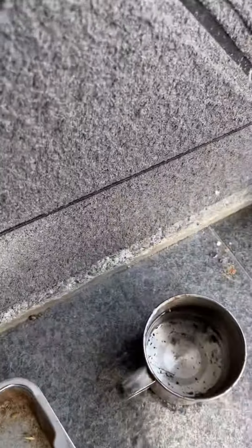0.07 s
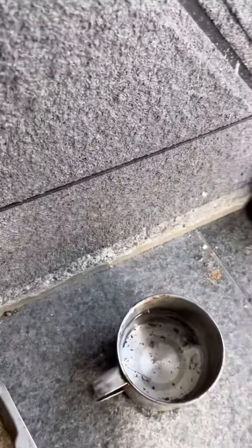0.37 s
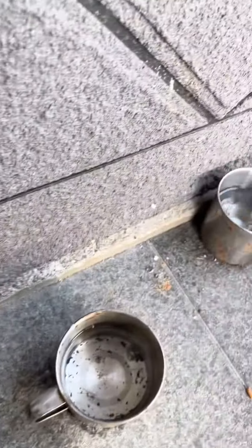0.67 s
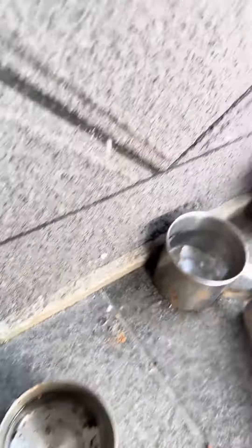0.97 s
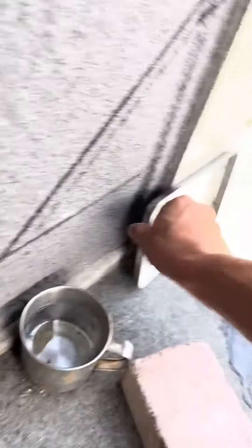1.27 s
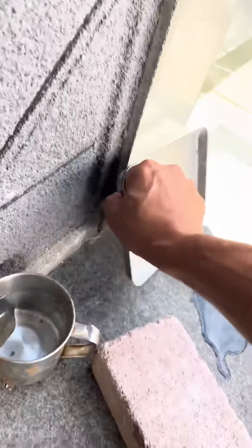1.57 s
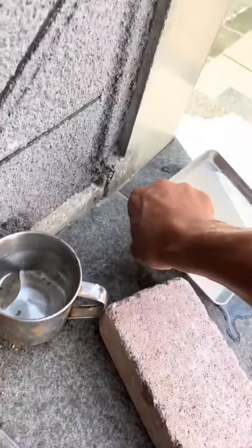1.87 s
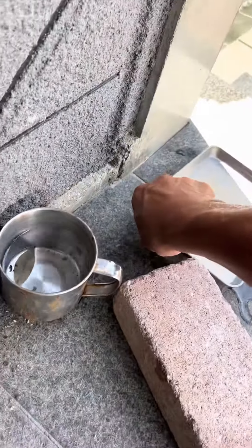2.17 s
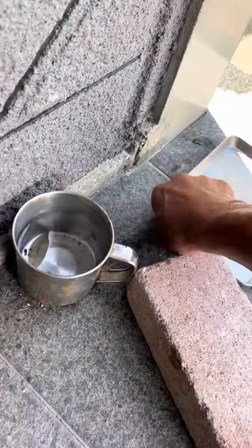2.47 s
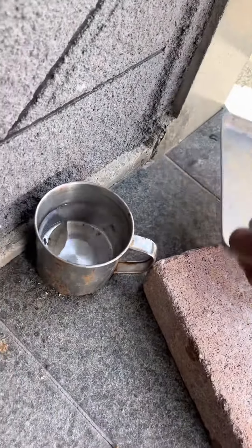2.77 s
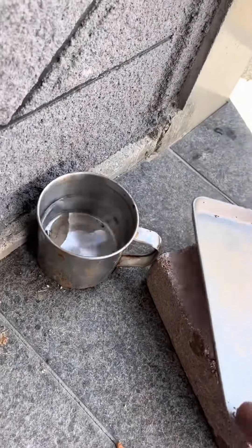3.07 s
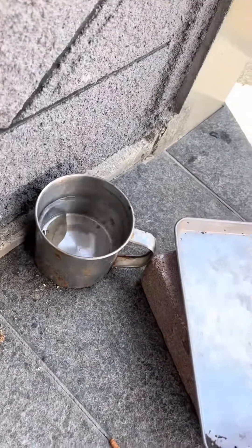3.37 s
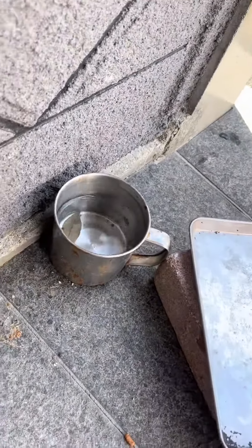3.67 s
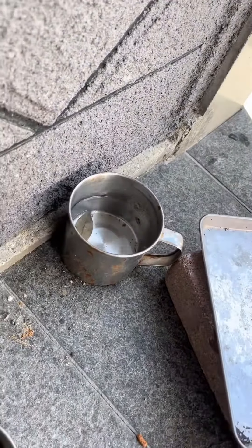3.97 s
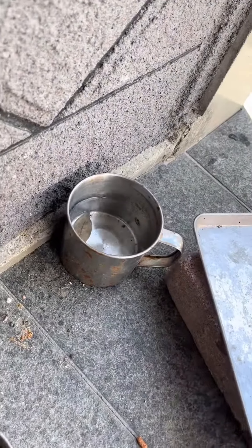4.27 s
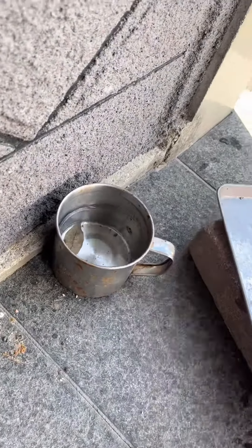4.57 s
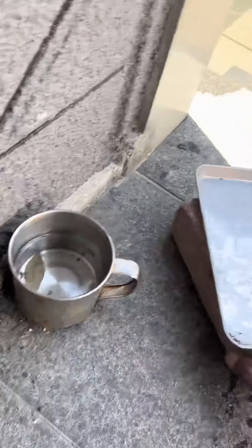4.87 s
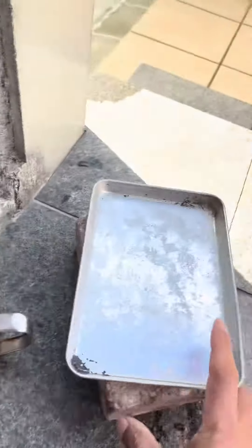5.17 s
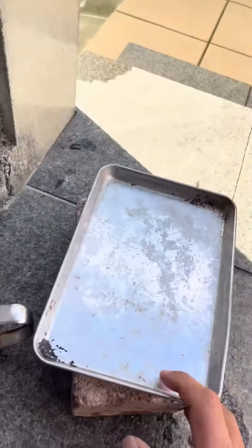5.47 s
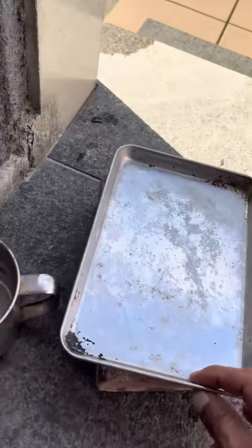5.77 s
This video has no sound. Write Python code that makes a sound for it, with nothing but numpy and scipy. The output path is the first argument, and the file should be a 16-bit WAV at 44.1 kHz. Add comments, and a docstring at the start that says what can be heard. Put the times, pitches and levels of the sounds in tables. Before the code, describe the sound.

Close metal clanks and a bright clatter come from a steel dish and cup on stone paving, followed by dull brick knocks. A thin tray rattles, clangs once, then clatters down onto the brick. After that the brick grinds and jolts across sandy stone, with a tiny squeal and some scuffs. Nearby walls add a short echo, and soft wind and handling bumps touch the microphone over an outdoor hush.

```python
"""A light knock, then a steel dish clanks and a cup clatters on the stone paving of an open porch.
A brick knocks down; a thin tray is picked up, bumped and dropped rattling onto it; then the brick is
dragged over gritty stone, ending in a thin squeal. Impacts excite normal modes, long-lived in steel and
heavily damped in brick; stick-slip friction makes the grinding. Close walls reverberate, and air and
handling rumble on the microphone over a quiet outdoor hush."""
import sys
import numpy as np
from scipy import signal
from scipy.fft import rfft, irfft, next_fast_len
from scipy.io import wavfile
from scipy.ndimage import map_coordinates

SR = 44100
rng = np.random.default_rng(int(sys.argv[2]) if len(sys.argv) > 2 else 0)


def to_wav(s):
    """Save 16-bit WAV."""
    ch = np.atleast_2d(s).T  # columns
    pcm = np.round(np.clip(ch, -1, 1) * 32767)  # PCM
    wavfile.write(sys.argv[1], SR, pcm.astype(np.int16))


N = 264732
TIME = np.arange(N) / SR
AGE = TIME[:SR]  # time since a blow

# contacts of the tray: t/s, level/dB, bass/dB, treble/dB, favoured f/Hz, ring/dB, damping t60/s
TRAY_CONTACTS = [(1.393, -17, -18, -14, 3020, -4, 0.56), (1.412, -19, -3, -36, 3060, 4.5, 0.18),
                 (1.430, -26, 7.5, -8, 700, 7, 2.2), (1.454, -18.5, -6, -2.5, 3070, 3, 0.39),
                 (1.489, -15.5, -4.5, -7, 1130, 7.5, 0.23), (1.514, -24.5, 8.5, -6, 670, 5, 5),
                 (1.8334, -2, -7.5, -21.5, 1900, -5.5, 2.2), (2.032, -17.5, -0.5, -14, 2250, -7.5, 1.7),
                 (2.097, -26, 3.5, -21, 990, 4, 0.3), (2.116, -20, 1, -18, 1160, -1, 0.47),
                 (2.134, -19, -16, -13.5, 2330, 0.5, 1.7), (2.555, -27.5, -6, -27, 5500, 8, 0.94),
                 (2.9447, -5.5, -4, -7.5, 2220, -18, 0.37), (3.058, -9.5, -9.5, -8, 1920, -2.5, 0.78),
                 (3.0922, -7, -4, -4, 4300, -10, 0.7), (3.1433, -9.5, -4.5, -6.5, 4530, 0.5, 0.12),
                 (3.164, -11, -3, -23, 1020, -16, 0.18), (3.1874, -9.5, -9, -10, 584, -18, 0.2),
                 (3.2048, -16, -14, -13, 2250, -5, 0.1), (3.231, -16, -2.5, -4.5, 6070, 4, 0.093)]
# normal modes of the tray: f/Hz, level/dB, t60/s
TRAY_MODES = [(386, -8.5, 0.19), (581, -8, 0.23), (701, -9.5, 1), (765, -8, 0.55), (1008.4, 2.5, 0.27),
              (1307, -15.5, 3.9), (1619, -3.5, 0.29), (1908, 0.5, 0.5), (2130, -5.5, 0.25),
              (2400, -9, 0.33), (2445, 3, 0.24), (2730, -8, .26), (3110, -1.5, 0.11), (3220, -7, 0.14),
              (3400, -11, 0.35), (3600, -11, 1.02), (3756, -16, 0.98), (3830, -10, 0.45), (4180, -6, 0.1),
              (4400, -28, 0.25), (4180, -5.5, 0.21), (4870, -34, 0.33), (5200, -27, 0.096), (5360, -24, .4),
              (5500, -8.5, 0.31), (5620, -1.5, 0.18), (6700, -5, 0.083), (7900, -18, .16),
              (10430, -31, 0.107)]


def steel(contacts, modes, mode_db, shimmer_db, shimmer_t60, chatter_db, chatter_t60,
          crack_db, mid_db, top_db, wet_db, count=130):
    """Modal superposition: each impact cracks, chatters and rings main modes and a crowd of weak ones."""
    crowd_hz = np.linspace(900, 15500, count) * np.exp(rng.normal(0, 0.0198, count))
    crowd_t60 = shimmer_t60 * (crowd_hz / 3000) ** -.35 * np.exp(rng.normal(0, 0.085, count))
    crowd = damped_sine(crowd_hz[:, None], crowd_t60[:, None])
    hz, level, t60 = np.transpose(modes)
    main = damped_sine(hz[:, None], t60[:, None])
    track = np.zeros(N)
    for s, db, bass_db, treble_db, favoured_hz, ring_db, damping_t60 in contacts:
        # the point of contact favours one group of modes
        favour = [(favoured_hz / 1.35, 0), (favoured_hz, 6), (favoured_hz * 1.35, 0)]
        tilt = [(700, 0.41 * bass_db), (1900, 0), (5000, 0), (11000, treble_db / 2)]
        scatter = amp(rng.normal(0, 1.5, len(hz))) * rng.choice([-1, 1], len(hz))
        strengths = amp(level + along(favour, hz) + along(tilt, hz)) * scatter
        # hand or ground damps the high modes sooner
        damped = main * fade(damping_t60 * (hz[:, None] / 2000) ** -.5)
        ring = amp(mode_db + ring_db) * (strengths @ damped)
        crowd_ring = rng.standard_normal(count) @ crowd / np.sqrt(count)
        shimmer = amp(shimmer_db) * crowd_ring * fade(damping_t60)
        # the rim buzzes against the stone, and every tiny touch sets the sheet ringing again
        touches = grains(SR, 1.6) * fade(chatter_t60)
        buzz = convolve(touches, shimmer * fade(0.022))
        chatter = amp(chatter_db) * (buzz + touches / 2)
        crack = amp(crack_db) * rng.standard_normal(SR) * fade(0.033)
        # a hard contact is bright, a padded one falls off steeply
        tone = [(100, bass_db - 20.5), (300, bass_db), (600, bass_db + 6), (1000, bass_db + 6.5),
                (2400, mid_db), (5000, -3.5), (8500, treble_db), (15000, 2.47 * treble_db + top_db)]
        clash = colour(colour(shimmer + chatter + crack, tone), favour)
        add(track, s, amp(db) * (porch(clash, wet_db) + ring))
    return track


def dish():
    """Free vibration of a struck steel shell: its low modes ring on after the clank."""
    # t/s, level/dB, bass/dB, treble/dB, favoured f/Hz, ring/dB, damping t60/s
    contacts = [(0.2915, -9.5, -1, -17.5, 955, -3, 4), (0.3014, -11.5, -5.5, -13.5, 1000, -4.5, 3.9),
                (0.3411, -8, -13, -23.5, 2410, -2.5, 1.1), (0.3504, -23.5, 6.5, -20, 570, 5, 6.6),
                (0.4424, -25.5, -5.5, -14.5, 774, -7.5, 3)]
    modes = [(531.4, -7.5, 0.83), (674.7, 1, 0.84), (758, -4, 0.46), (775, -10.5, 1.6), (948, 4, 0.12),
             (1027, 12, 0.093), (1126, -8, .6), (1343, -2, 0.47), (1670, 0, 0.19), (2020, -4, 0.26),
             (2133, -6, .2), (2305, -5.5, 0.61), (2420, 0, 0.095), (2703, -11.5, 0.23), (3476, -4, 0.34),
             (3924, 1.5, 0.15), (4300, -14.5, 0.87), (6830, -15, 0.32)]  # f/Hz, level/dB, t60/s
    return steel(contacts, modes, mode_db=-14.5, shimmer_db=-24, shimmer_t60=0.58, chatter_db=-9.5,
                 chatter_t60=0.19, crack_db=-18.5, mid_db=2.5, top_db=14, wet_db=-2)


def cup():
    """A smaller shell has higher natural frequencies, so its impacts clatter brightly."""
    # t/s, level/dB, bass/dB, treble/dB, favoured f/Hz, ring/dB, damping t60/s
    contacts = [(0.606, -6, -5.5, -7, 4200, -3, 0.75), (0.614, -7, -22, -2.5, 6430, 5, 0.8),
                (0.6244, -17, 1, -7, 4400, 9.5, 1.3), (0.642, -10, -21, -8, 6400, 8, 0.43),
                (0.666, -6, -16, -11, 4070, -3, 1.5), (0.6754, -15, 0.5, -2, 4230, -7, 3.6),
                (0.7044, -10, -6, -4, 5600, 3.5, 7.8)]
    modes = [(550, -9.5, 0.13), (1292, -8.5, 0.66), (2800, -15, 0.077), (3660, -11, 0.46), (3870, -19, .3),
             (4030, -17.5, 0.79), (4160, -3, 0.081), (4286, -2.5, 0.11), (5480, -11.5, 0.3),
             (5530, -7, 0.23), (6170, -20, .28), (8300, -9, 0.27), (8860, -10.5, 0.12), (10314, -15, 0.2),
             (11720, -13.5, 0.12), (13700, -20, .14)]  # f/Hz, level/dB, t60/s
    return steel(contacts, modes, mode_db=-18, shimmer_db=-2, shimmer_t60=0.074, chatter_db=-13,
                 chatter_t60=0.04, crack_db=-7, mid_db=-11.5, top_db=6, wet_db=-1.5)


def tray():
    """Impacts excite the bending modes of a thin plate as it is lifted, bumped and dropped."""
    return steel(TRAY_CONTACTS, TRAY_MODES, mode_db=-17.5, shimmer_db=-8.5, shimmer_t60=0.32,
                 chatter_db=-6, chatter_t60=0.088, crack_db=-1.5, mid_db=-4.5, top_db=-1, wet_db=-9)


def tray_slide(sing_hz=2405, focus_db=17):
    """Forced vibration: friction at the sliding edge drives the tray's modes, most near sing_hz."""
    focus = [(sing_hz / 1.1, 0), (sing_hz, focus_db), (sing_hz * 1.05, 0)]
    modes = [(hz, db + along(focus, hz), min(t60, .17))
             for hz, db, t60 in TRAY_MODES if hz > sing_hz / 2]
    friction = swell(s=2.532, db=-32.5, rise=0.035, fall=0.07) * grains(N, 2.4)
    return resonate(friction, modes)


def brick_knocks(crunch_db=-10, over_brick_s=2.8, thud_db=-5.5, thud_hz=375, thud_contact_s=0.0015):
    """Heavy damping leaves the struck brick a dead clack; a longer contact softens the attack."""
    blows = [(0.2097, -16, 690, 0.00058), (0.698, 0.5, 1132, 0.00048), (0.738, -13, 1270, 0.001),
             (0.9308, 2.5, 1100, 0.00073), (0.945, -7, 1330, 0.0019), (2.207, -21, 975, 0.0018)]  # t/s, level/dB, f/Hz, contact time/s
    modes = [(0.599, -6.5, 0.015), (.92, -1.5, 0.014), (1.25, -7.5, 0.015), (2.1, -7, 0.0072)]  # frequency ratio, level/dB, t60/s
    # the falling tray also thuds on the brick
    thuds = [(s, db + thud_db, thud_hz * np.exp(rng.normal(0, .1)), thud_contact_s)
             for s, db, *_ in TRAY_CONTACTS if s > over_brick_s]
    track = np.zeros(N)
    for s, db, hz, contact_s in blows + thuds:
        clack = sum(amp(level) * damped_sine(ratio * hz, t60) for ratio, level, t60 in modes)
        stone = [(hz / 7, -16), (hz / 3, -1), (hz * 1.3, 0),
                 (hz * 2.5, -10), (hz * 4.5, -28), (hz * 10, -55)]
        crunch = amp(crunch_db) * unit(colour(rng.standard_normal(SR), stone)) * fade(0.028)
        attack = 1 - np.exp(-(AGE / contact_s) ** 2)
        add(track, s, amp(db) * porch((clack + crunch) * attack, wet_db=-10))
    return track


def brick_drag(start_s=4.09, attack_s=0.19, stop_s=5.31, release_s=0.11, pull_db=-40.5,
               grit_db=-40, grit_growth=0.75, wear_db_per_s=6.5):
    """Stick-slip friction: the brick grinds and jolts while crushed grit hisses and screeches."""
    shoves = [(4.27, -34, 0.061, 0.034), (4.39, -28, 0.12, 0.41), (4.555, -28, 0.18, 0.2),
              (4.647, -20, 0.015, 0.1), (4.872, -26.5, 0.1, 0.19), (5.225, -22.5, 0.19, 0.19),
              (5.295, -27, 0.074, 0.092)]  # on top of the steady pull: t/s, level/dB, rise/s, fall/s
    jolts = [(4.368, -12), (4.445, -9.5), (4.567, -15), (4.638, -10), (4.872, -8), (4.942, -12),
             (5.193, -15), (5.236, -18)]  # the brick catches: t/s, level/dB
    grind_spectrum = [(150, -25), (280, -2), (350, 0.5), (720, 4), (1050, 0), (1600, -14), (2600, -17),
                      (5000, -43)]  # f/Hz, level/dB
    grit_spectrum = [(600, -10), (2000, -1.5), (3500, -4), (4300, -2), (5200, -17), (6200, -8), (8900, -15),
                     (10400, -24), (12500, -23), (15500, -23)]  # f/Hz, level/dB
    sand_spectrum = [(800, 6.5), (2800, 8), (6000, 3), (9000, -1), (15500, -4)]  # f/Hz, level/dB
    screech_modes = [(4540, -1.5, 0.039), (4820, -8, 0.022), (4860, -1, 0.039), (5400, -6.5, 0.04),
                     (5920, -7.5, 0.018), (9730, -7, 0.035), (9700, -13.5, 0.012), (14100, -20, .02)]  # f/Hz, level/dB, t60/s
    moving = np.clip((TIME - start_s) / attack_s, 0, 1)
    stopping = amp(-20 * np.maximum(TIME - stop_s, 0) / release_s)
    effort = power_sum([amp(pull_db) * moving] + [swell(*shove) for shove in shoves]) * stopping
    slips = wobble(90)
    push = power_sum([amp(-2) * effort * unit(amp(1.05 * slips)), amp(-10) * bursts(jolts, t60=0.048)])
    grinding = push * friction_noise(grind_spectrum, 3.6)
    # the grit follows the push and, from the second shove on, thins out as it is ground down
    worn = amp(-wear_db_per_s * np.maximum(TIME - shoves[1][0], 0))
    grit_gain = amp(grit_db) * worn * (push / amp(-31)) ** grit_growth * np.sqrt(moving)
    # each resonance flares by itself, and only under a firm push
    flares = sum(amp(db + 4 * wobble(25)) * resonate(grains(N, 9.2), [(hz, db, t60)])
                 for hz, db, t60 in screech_modes)
    screech = amp(-2) * np.tanh(effort / amp(-38.5)) * unit(flares)
    hiss = unit(colour(grains(N, 3.3), grit_spectrum) * amp(4 * slips))
    # loose sand is swept aside as the brick first moves
    sweep = swell(s=4.145, db=-38, rise=0.05, fall=0.4) * stopping
    sand = sweep * friction_noise(sand_spectrum, 4.7)
    return porch(grinding + grit_gain * (hiss + screech) + sand, wet_db=-17.5)


def scuffs(stroke_db=-2, tick_db=-8, stutter_s=4.1948, stutter_gap_s=0.026, stutter_db=-25):
    """Sliding friction on rough stone: light strokes rasp, and single sand grains fracture."""
    strokes = [(0.286, -43.5, -50, 0.02, 0.026), (0.875, -39.5, -40, 0.04, 0.05),
               (0.917, -41.5, -33.5, 0.024, 0.048), (2.165, -36, -41.5, 0.047, 0.035),
               (2.314, -39.5, -52, 0.037, 0.053), (2.49, -35.5, -44.5, 0.042, 0.075),
               (2.535, -33, -52, 0.04, 0.04), (2.566, -51, -34.5, 0.035, 0.025),
               (3.906, -36, -34.5, 0.013, 0.075), (5.569, -39, -38.5, 0.058, 0.038),
               (5.698, -30.5, -46, 0.025, 0.078), (5.745, -29.5, -35, 0.022, 0.068),
               (5.775, -49, -30.5, 0.1, 0.1), (5.826, -29, -24.5, 0.016, 0.043),
               (5.882, -38, -43, 0.04, 0.03)]  # t/s, rasp level/dB, sand level/dB, rise/s, fall/s
    ticks = [(0.8498, -31), (0.9023, -27), (3.7733, -38), (3.8198, -28), (3.9239, -24.5), (3.9708, -31),
             (4.115, -28), (5.218, -21.5), (5.5528, -25), (5.5639, -21), (5.6645, -23.5), (5.821, -18),
             (5.8314, -19.5)]  # grains cracking under an edge: t/s, level/dB
    rasp_spectrum = [(300, -16), (900, 10), (2500, 4.5), (4000, -1.5), (7000, -18)]  # f/Hz, level/dB
    sand_spectrum = [(2000, -34), (4200, 4), (6300, 4.5), (9000, -2), (12000, -6), (15500, -5)]  # f/Hz, level/dB
    crack_spectrum = [(300, -7), (1200, 1.5), (3000, 4.5), (6500, -1), (10000, -2.5), (15500, -19)]
    rasp_gain = power_sum(swell(s, db, rise, fall) for s, db, _, rise, fall in strokes)
    sand_gain = power_sum(swell(s, db, rise, fall) for s, _, db, rise, fall in strokes)
    rasp = rasp_gain * friction_noise(rasp_spectrum, 4.5)
    sand = sand_gain * friction_noise(sand_spectrum, 2.5)
    # the brick sticks and slips evenly as it gets going
    stutter = [(stutter_s + k * stutter_gap_s, stutter_db) for k in range(5)]
    cracks = bursts(ticks + stutter, t60=0.056) * friction_noise(crack_spectrum, 0.9)
    return porch(amp(stroke_db) * (rasp + sand) + amp(tick_db) * cracks, wet_db=-11.5)


def squeal(pitch_hz=2196, rise_hz_per_s=170):
    """A harmonic series on a slowly rising fundamental pulses thinly as the drag ends."""
    pulses = [(5.355, -38, 0.09, 0.029), (5.425, -48, 0.016, 0.04), (5.472, -50.5, 0.015, 0.052)]  # t/s, level/dB, rise/s, fall/s
    hz = pitch_hz + rise_hz_per_s * (TIME - pulses[0][0])
    phase = 2 * np.pi * np.cumsum(hz) / SR
    tone = sum(amp(db) * np.sin(k * phase) for k, db in enumerate([1, -10, -22, -19], 1))
    return porch(sum(swell(*pulse) for pulse in pulses) * tone, wet_db=-2.5)


def porch(x, wet_db, delay_s=0.0057):
    """Reverberation: close walls add a diffuse tail to x, in which the treble dies first."""
    decay_times = [(200, 0.7), (1000, 0.32), (4000, 0.26), (14000, 0.12)]  # f/Hz, t60/s
    hz, t, spectra = signal.stft(rng.standard_normal(SR // 2), SR, nperseg=256)
    decay = np.exp(-np.log(1000) * t / along(decay_times, hz)[:, None])
    tail = signal.istft(spectra * decay, SR, nperseg=256)[1]
    onset = np.clip(np.arange(len(tail)) / SR / delay_s - .5, 0, 1)
    return x + amp(wet_db) * convolve(x, tail * onset)


def air_and_handling(buffet_db=-2, bump_db=-4, wander_db=0.8, flutter_db=3):
    """Turbulent pressure rumbles on the microphone, and the hand's bumps reach it through its body."""
    light_air = [(0, -41), (1.0, -43), (1.7, -40.5), (2.3, -45), (3.75, -46.5), (4.4, -39), (5.42, -47),
                 (5.9, -37.5)]  # calm while the microphone rests: t/s, level/dB
    puffs = [(0.053, -34.5, 0.28), (0.357, -31, 0.19), (0.495, -33.5, 0.13), (0.663, -25.5, 0.15),
             (1.41, -36, 0.12), (1.618, -18, 0.087), (1.821, -27, 0.15), (1.95, -35.5, 0.2),
             (4.365, -36, 0.58), (4.71, -30, 0.074), (4.852, -36, 0.33), (5.263, -33.5, 0.12),
             (5.527, -22.5, 0.065), (5.93, -36.5, 1)]  # as it swings: t/s, level/dB, length/s
    rumble_spectrum = [(25, -35), (52, -2), (75, 1), (160, -2.5), (210, -9), (300, -14), (500, -24.5),
                       (1000, -64)]  # f/Hz, level/dB
    bumps = [(0.473, -14, 71.4), (0.492, -12, 85), (1.061, -21, 122), (1.593, -20.5, 236),
             (1.636, -12, 120), (1.717, -14, 93.5), (1.781, -12.5, 107), (2.18, -23, 132),
             (3.823, -18, 104), (4.273, -16, 80), (5.522, -31, 140), (5.978, -12.5, 100)]  # t/s, level/dB, f/Hz
    air_db = np.interp(TIME, *np.transpose(light_air))
    air = amp(air_db + wander_db * wobble(1.98) + flutter_db * wobble(5))
    flow = power_sum([air] + [swell(s, db, length / 2, length / 2) for s, db, length in puffs])
    track = amp(buffet_db) * flow * unit(colour(rng.standard_normal(N), rumble_spectrum))
    for s, db, hz in bumps:
        add(track, s, amp(db + bump_db) * damped_sine(hz, 0.076) * (1 - fade(0.0075)))
    return track


def hush(level_db=-50):
    """Stationary noise: the distant outdoor background."""
    spectrum = [(50, -5), (110, -17.5), (165, 12), (220, -12.5), (320, 2), (600, -6.5), (1100, -3.5),
                (2000, -10), (3000, -18), (3900, -14), (5000, -24.5), (8000, -29.5), (12000, -40.5),
                (16000, -47)]  # f/Hz, level/dB
    return amp(level_db) * unit(colour(rng.standard_normal(N), spectrum))


def amp(db):
    """Decibels to amplitude ratio."""
    return 10 ** (np.asarray(db) / 20)


def unit(x):
    """Normalisation to rms 1."""
    return x / np.sqrt(np.mean(x ** 2) + 1e-20)


def fade(t60):
    """Exponential decay, 60 dB in t60 seconds."""
    return np.exp(-np.log(1000) * AGE / np.maximum(t60, 1e-3))


def damped_sine(hz, t60):
    """Impulse response of one mode."""
    return np.sin(2 * np.pi * hz * AGE) * fade(t60)


def convolve(x, response):
    """Convolution with an impulse response scaled to unit energy."""
    return signal.fftconvolve(x, response / np.linalg.norm(response))[:len(x)]


def resonate(x, modes):
    """Forced response to x of modes given as f/Hz, level/dB, t60/s."""
    return convolve(x, sum(amp(db) * damped_sine(hz, t60) for hz, db, t60 in modes))


def along(points, hz):
    """Interpolation of (f/Hz, value) points on a logarithmic frequency axis."""
    f, value = np.transpose(points)
    return np.interp(np.log(hz + 1), np.log(f + 1), value)


def colour(x, points):
    """Minimum-phase filtering by a curve of f/Hz, level/dB."""
    size = 2 * next_fast_len(len(x) // 2 + 2048)
    cepstrum = irfft(np.log(amp(along(points, np.fft.rfftfreq(size, 1 / SR)))))
    cepstrum[1:size // 2] *= 2  # folding the cepstrum makes the filter causal
    cepstrum[size // 2 + 1:] = 0
    return irfft(rfft(x, size) * np.exp(rfft(cepstrum)), size)[:len(x)]


def grains(size, spread_db):
    """Random amplitude modulation clumps noise of rms 1 into millisecond grains."""
    knots = rng.standard_normal(size // 44 + 2)
    strength = np.interp(np.linspace(0, len(knots) - 1, size), np.arange(len(knots)), knots)
    return unit(rng.standard_normal(size) * amp(spread_db * np.minimum(strength, 2)))


def friction_noise(spectrum, spread_db):
    """Micro-impacts of rough surfaces: grainy noise shaped by a spectrum, at rms 1."""
    return unit(colour(grains(N, spread_db), spectrum))


def wobble(rate):
    """Slow random modulation, with rate knots a second."""
    return map_coordinates(rng.standard_normal(int(N * rate / SR) + 4), [TIME * rate], order=1)


def swell(s, db, rise, fall):
    """Exponential growth and decay about time s: 20 dB up in rise seconds, 20 dB down in fall."""
    return amp(db - 20 * np.maximum((s - TIME) / max(rise, 1e-3), (TIME - s) / max(fall, 1e-3)))


def bursts(slips, t60):
    """Envelope of short slips (t/s, level/dB), each decaying exponentially."""
    envelope = np.zeros(N)
    for s, db in slips:
        add(envelope, s, amp(db) * fade(t60))
    return envelope


def power_sum(envelopes):
    """Incoherent sources add in power."""
    return np.sqrt(sum(envelope ** 2 for envelope in envelopes))


def add(track, s, sound):
    """Superpose a sound on the track at time s."""
    span = track[max(round(s * SR), 0):][:len(sound)]
    span += sound[:len(span)]


def scene():
    """Superposition of all sources at one microphone."""
    steelware = dish() + cup() + tray() + tray_slide()
    stonework = brick_knocks() + brick_drag() + scuffs() + squeal()
    return (steelware + stonework + air_and_handling() + hush())[None]


def record(dry, low_cut_hz=44, top_hz=15900):
    """Band limiting: the small microphone drops the deepest bass, and the treble ends at top_hz."""
    high_pass = signal.butter(N=3, Wn=low_cut_hz, btype="high", fs=SR, output="sos")
    thin = signal.sosfilt(high_pass, dry)
    size = next_fast_len(N + SR // 2)
    low_pass = 1 / (1 + (np.fft.rfftfreq(size, 1 / SR) / top_hz) ** 160)
    return irfft(rfft(thin, size) * low_pass, size)[..., :N]


dry = scene()
out = record(dry)
to_wav(out)
```